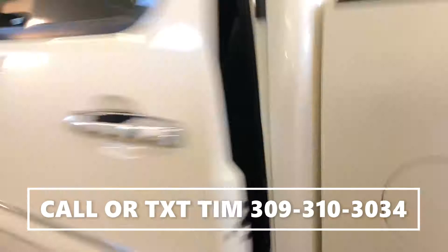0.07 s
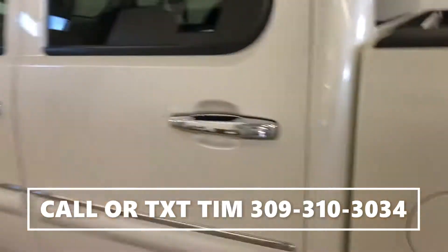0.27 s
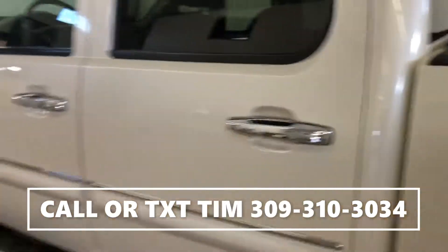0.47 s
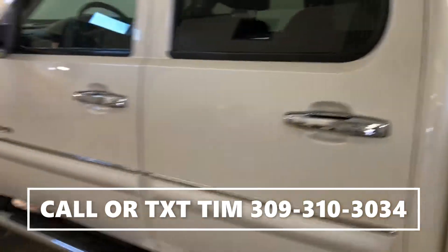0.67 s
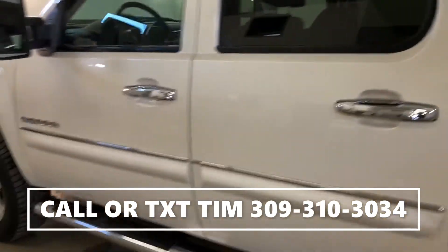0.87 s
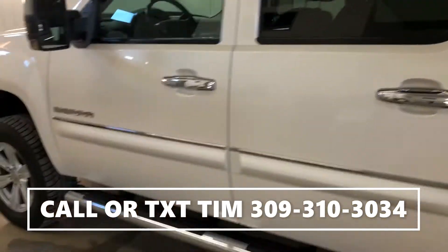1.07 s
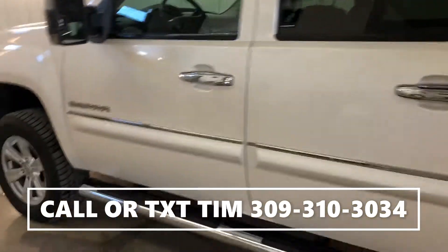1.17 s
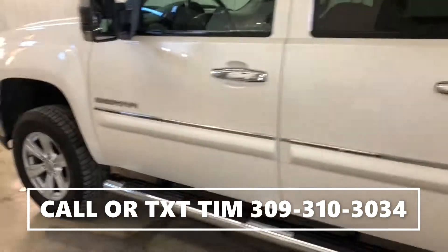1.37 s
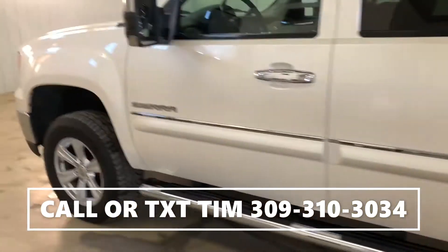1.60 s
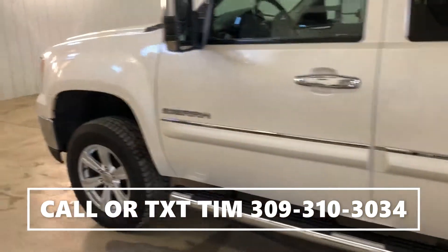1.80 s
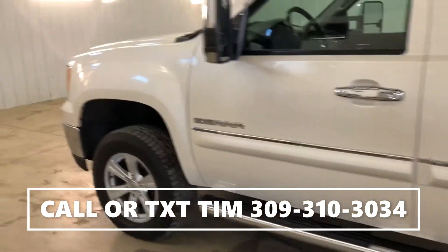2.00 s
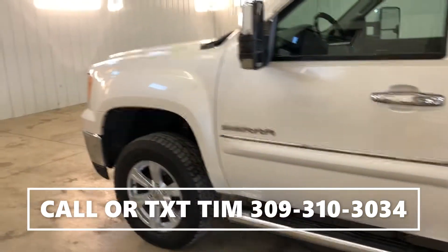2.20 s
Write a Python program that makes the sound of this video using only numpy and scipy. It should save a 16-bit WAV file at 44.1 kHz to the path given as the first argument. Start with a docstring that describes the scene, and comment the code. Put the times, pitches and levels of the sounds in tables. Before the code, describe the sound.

A pickup truck door slams shut once, close by, about a quarter second in, just after faint shoe scuffs. The latch snaps, the steel door booms and a tiny metallic rattle ends by 0.4 seconds. The large garage bay echoes for over a second. Faint scuffs come from around 0.9 seconds and soft steps near 2 seconds, over quiet clothing rustle and a low rush of ventilation.

```python
"""A large hard-walled garage bay, the microphone close to a pickup door. Shoes scuff over the ventilation.
A quarter second in, the door pushes air ahead of it and slams: the latch snaps over the striker,
the steel shell booms twice and the loose pawl rattles. The floor and the truck's side answer at once,
the far wall a little later. The bay rings on for over a second while someone softly steps back."""
import sys
import numpy as np
from scipy import signal
from scipy.fft import rfft, irfft, next_fast_len
from scipy.io import wavfile

SR = 44100
rng = np.random.default_rng(int(sys.argv[2]) if len(sys.argv) > 2 else 0)


def to_wav(s):
    """Save 16-bit WAV."""
    ch = np.atleast_2d(s).T  # columns
    pcm = np.round(np.clip(ch, -1, 1) * 32767)  # PCM
    wavfile.write(sys.argv[1], SR, pcm.astype(np.int16))


N = 99225

# Blows on the door shell. Each row: start in seconds, level in dB, hardness as a corner in Hz.
DOOR_BLOWS = [(.2357, -15, 1800), (0.2436, 0, 1030), (0.2698, -11.5, 680), (0.2778, -2, 210)]
# Modes of the shell and the cab behind it. Each row: pitch in Hz, level in dB, t60 in seconds.
SHELL_MODES = [(52.5, -13.5, 0.33), (92.7, -7, 0.16), (128, -5.5, 0.13), (155, -9, .08), (190.5, -1.5, .12),
               (222.2, -4.5, 0.074), (257, -10.5, 0.058), (304, -12, 0.11), (402, -7.5, 0.053),
               (473, -8, 0.1), (770, -8.5, 0.065), (890, -16.5, 0.033)]
# Crunch of countless short-lived modes in panels and trim. Each row: frequency in Hz, gain in dB.
CRUNCH_SPECTRUM = [(40, 6), (130, -2), (220, 1), (400, 1), (530, -1), (670, -27), (800, -5.5), (1050, -7.5),
                   (1300, -17), (3000, -27), (9000, -39)]
# Metal contacts of latch and door edge.
# Each row: start in seconds, level in dB, t60 in seconds, tilt in dB per octave.
LATCH_CLACKS = [(.2355, -15, .05, -2.5), (0.2416, -10, 0.045, 0.5), (0.2446, -10, 0.028, 1),
                (0.2469, -15, 0.041, .5), (0.267, -24.5, 0.077, 2), (.277, -25.5, 0.052, 1.5)]
# The pawl knocking in its play. Each row: start in seconds, level in dB.
PAWL_KNOCKS = [(0.2921, -14), (0.3155, -18.5), (0.346, -31), (0.371, -34)]
# Ringing latch parts and pawl. Each row: pitch in Hz, level in dB.
LATCH_MODES = [(1502, -37), (2347, -22), (2510, -29), (3677, -28)]
PAWL_MODES = [(1470, -2.5), (1810, -4.5)]
# Noise of a clack, a pawl knock and the air in the door gap. Each row: frequency in Hz, gain in dB.
CLACK_SPECTRUM = [(100, -27), (400, 10), (1000, 5.5), (1600, -1.5), (3500, -5.5), (6000, -11), (10000, -19),
                  (15500, -19)]
KNOCK_SPECTRUM = [(300, -6), (1100, 3.5), (1600, 8.5), (2400, 7.5), (3500, -4), (7000, -9.5),
                  (15500, -26.5)]
GAP_SPECTRUM = [(25, -30), (80, -9.5), (300, 2), (450, 0.5), (700, -3), (2000, -22.5), (8000, -45)]
# Echoes off floor and truck, off the far wall, and all round the bay as it starts to ring.
# Each row: frequency in Hz, gain in dB.
NEAR_SPECTRUM = [(50, -10.5), (200, -22.5), (600, -14), (2000, -10), (6000, -12.5), (15000, -8)]
WALL_SPECTRUM = [(40, -28), (120, -16.5), (300, -16.5), (600, -15.5), (1500, -37), (5000, -22),
                 (15000, -26)]
BAY_SPECTRUM = [(25, -13), (50, -2.5), (110, 2), (220, -1), (320, -2), (500, -8), (900, -14), (1700, -22),
                (2700, -25), (4000, -31), (6000, -37.5), (9000, -38), (15000, -35)]
# How long the bay rings. Each row: frequency in Hz, t60 in seconds.
BAY_DECAY = [(50, 1.3), (110, 0.61), (220, 1.4956), (500, 2.4249), (1400, 3), (3000, 2.66), (6000, 1.47),
             (10000, 0.53), (15000, 0.36)]
# Shoes and clothes scuffing. Each row: start in seconds, level in dB, rise and t60 in seconds.
SHOE_SCUFFS = [(.06, -55.5, 0.036, 1), (0.129, -50.5, 0.011, 0.44), (0.161, -50, 0.008, 0.063),
               (.915, -46.5, 0.0096, 1), (1.29, -58.5, 0.1, 0.36), (1.6, -55.5, 0.055, 1.0)]
# Small taps of moving about. Each row: start in seconds, level in dB, tilt in dB per octave.
SMALL_TAPS = [(0.071, -58, 5), (0.137, -54, 8), (2.003, -60, 9), (2.1, -55, 6), (2.127, -49, -3)]
# Soft footfalls. Each row: start in seconds, level in dB.
SOFT_FOOTFALLS = [(1.863, -53), (2.096, -46), (2.214, -48)]
# Noise of scuffs and taps, of cloth and of the ventilation. Each row: frequency in Hz, gain in dB.
SCUFF_SPECTRUM = [(150, -1), (600, 2), (1500, 0.5), (4000, -0.5), (6000, -15), (9000, -21), (15000, -27)]
CLOTH_SPECTRUM = [(500, -20), (3000, 0.5), (7000, -1), (10000, -4), (15000, -9)]
VENT_SPECTRUM = [(20, -6), (45, -1.5), (110, 0), (220, -2), (320, -6), (550, -6.5), (1200, -12.5),
                 (3000, -18.5), (6000, -30.5), (10000, -43), (15500, -37.5)]
# Loudness of the cloth and of the ventilation. Each row: time in seconds, level in dB.
CLOTH_LEVELS = [(0, -63.5), (.19, -65.5), (.3, -65), (.95, -73), (1.2, -73.5), (1.7, -79), (1.9, -85),
                (2.1, -73), (2.25, -75.5)]
VENT_LEVELS = [(0, -49.5), (.22, -55.5), (.6, -57.5), (1.4, -54), (2.25, -55.5)]

CRUNCH_DB, KNOCK_NOISE_DB = -4.5, -6.5  # relative to each blow or knock
GAP_PEAK_DB, GAP_RISE_DB_PER_S, GAP_SHUT_S = -25, 514, 0.249
BAY_START_S, BAY_BUILD_S, BAY_DB = 0.22, 0.059, -19
RIPPLE_DB, RIPPLE_STEP_HZ = 2.5, 21.93  # uneven ringing across the bay's echo
WALL_DELAY_S = 0.1083
CLOTH_TICKS_PER_S = 220
LOW_CUT_HZ, TOP_HZ, CEILING = 60, 15900, 0.97


def door_shell():
    """Close up, each blow rings the shell and crunches its trim; soft blows reach only the low modes."""
    out = np.zeros(N)
    for start, db, corner in DOOR_BLOWS:
        rolloff_db = lambda hz: -10 * np.log10(1 + (hz / corner) ** 4)
        modes = sum(amp(level + rolloff_db(hz)) * ring(start, hz, t60, swell_cycles=0.46)
                    for hz, level, t60 in SHELL_MODES)
        crunch = noise([(hz, level + rolloff_db(hz)) for hz, level in CRUNCH_SPECTRUM])
        crunch *= amp(CRUNCH_DB) * burst(start, rise=0.0021, t60=0.09)
        out += amp(db) * (modes + crunch)
    return out


def latch_snap():
    """The latch snaps over the striker: each metal contact clacks and rings the steel parts."""
    out = np.zeros(N)
    for start, db, t60, tilt in LATCH_CLACKS:
        steel = sum(amp(level + rng.normal(0, 1.6)) * ring(start, hz, t60=0.09, swell_cycles=0.79)
                    for hz, level in LATCH_MODES)
        clack = burst(start, rise=0.00058, t60=t60) * noise(CLACK_SPECTRUM, tilt)
        out += amp(db) * (clack + steel)
    return out


def pawl_rattle():
    """The loose pawl knocks in its play and rings briefly, weaker each time."""
    out = np.zeros(N)
    for start, db in PAWL_KNOCKS:
        pawl = sum(amp(level) * ring(start, hz, t60=0.04, swell_cycles=0.71) for hz, level in PAWL_MODES)
        knock = amp(KNOCK_NOISE_DB) * burst(start, rise=0.00092, t60=0.025) * noise(KNOCK_SPECTRUM)
        out += amp(db) * (pawl + knock)
    return out


def gap_air():
    """Air squeezed out of the closing gap swells until the door lands."""
    seconds_left = np.maximum(GAP_SHUT_S - since(0), 0)
    swell = amp(GAP_PEAK_DB - GAP_RISE_DB_PER_S * seconds_left)
    return swell * fade(since(GAP_SHUT_S), t60=0.05) * noise(GAP_SPECTRUM)


def reflections(door):
    """Floor and truck throw the slam straight back to the microphone; the far wall adds a dull slap."""
    near = rng.standard_normal(N) * burst(0.001, rise=0.017, t60=0.15)
    slap = rng.standard_normal(N) * burst(WALL_DELAY_S, rise=0.0046, t60=0.15)
    near = coloured(near / np.linalg.norm(near), NEAR_SPECTRUM)
    slap = coloured(slap / np.linalg.norm(slap), WALL_SPECTRUM)
    return signal.fftconvolve(door, near + slap)[:N]


def bay_echo():
    """The hard walls return a faintly ringing wash of noise; bass and treble die first."""
    hz, times, spectra = signal.stft(noise(BAY_SPECTRUM), SR, nperseg=2048)
    age = np.maximum(times - BAY_START_S, 0)
    decay = fade(age, along(BAY_DECAY, hz)[:, None])
    uneven = np.interp(hz / RIPPLE_STEP_HZ, np.arange(len(hz)), rng.standard_normal(len(hz)))
    ripple = unit(amp(RIPPLE_DB * uneven))[:, None]
    wash = signal.istft(spectra * ripple * decay, SR, nperseg=2048)[1][:N]
    build = 1 - np.exp(-(since(BAY_START_S) / BAY_BUILD_S) ** 2)
    return amp(BAY_DB) * wash * build


def footwork():
    """Shoes scuff and tap beside the truck, and soft footfalls ring low."""
    scuffs = sum(amp(db) * burst(start, rise, t60) * noise(SCUFF_SPECTRUM)
                 for start, db, rise, t60 in SHOE_SCUFFS)
    taps = sum(amp(db) * burst(start, rise=0.00043, t60=0.035) * noise(SCUFF_SPECTRUM, tilt)
               for start, db, tilt in SMALL_TAPS)
    falls = sum(amp(db) * ring(start, hz=200, t60=0.32, swell_cycles=0.7) for start, db in SOFT_FOOTFALLS)
    return scuffs + taps + falls


def cloth_rustle():
    """Moving clothes give off tiny ticks of random size."""
    ticks = (rng.random(N) < CLOTH_TICKS_PER_S / SR) * rng.random(N)
    grains = signal.fftconvolve(ticks, fade(since(0), t60=0.043))[:N]
    return level_curve(CLOTH_LEVELS) * unit(grains * noise(CLOTH_SPECTRUM))


def ventilation():
    """Room tone behind it all: a low rush of air whose level drifts a little."""
    return level_curve(VENT_LEVELS) * noise(VENT_SPECTRUM)


def amp(db):
    """Decibels as an amplitude ratio."""
    return 10 ** (np.asarray(db) / 20)


def unit(x):
    """x scaled to rms 1."""
    return x / np.sqrt(np.mean(x ** 2) + 1e-20)


def along(points, hz):
    """(Hz, value) points read off on a log frequency axis."""
    point_hz, values = np.transpose(points)
    return np.interp(np.log(hz + 1), np.log(point_hz + 1), values)


def since(start):
    """Seconds since start, zero before."""
    return np.maximum(np.arange(N) / SR - start, 0)


def level_curve(points):
    """Amplitude that follows (seconds, dB) points."""
    return amp(np.interp(since(0), *np.transpose(points)))


def fade(t, t60):
    """Exponential decay, 60 dB down after t60 seconds."""
    return np.exp(-np.log(1000) * t / t60)


def burst(start, rise, t60):
    """A straight rise, then an exponential decay; times in seconds."""
    return np.minimum(since(start) / rise, 1) * fade(since(start + rise), t60)


def ring(start, hz, t60, swell_cycles):
    """One struck mode that swells over a part of its cycle."""
    t = since(start)
    return np.sin(2 * np.pi * hz * t) * fade(t, t60) * (1 - np.exp(-t * hz / swell_cycles))


def noise(spectrum, tilt_db=0):
    """Noise of rms 1 with a (Hz, dB) spectrum, tilted by tilt_db per octave above 200 Hz."""
    hz = np.fft.rfftfreq(N, 1 / SR)
    octaves = np.log2(np.maximum(hz, 200))
    gain = amp(along(spectrum, hz) + tilt_db * octaves)
    return unit(irfft(rfft(rng.standard_normal(N)) * gain, N))


def coloured(x, spectrum):
    """x through a causal filter with the given (Hz, dB) gains."""
    size = 2 * next_fast_len(N)
    gain = amp(along(spectrum, np.fft.rfftfreq(size, 1 / SR)))
    cepstrum = irfft(np.log(gain), size)
    cepstrum[1:size // 2] *= 2  # folded onto positive time for minimum phase
    cepstrum[size // 2 + 1:] = 0
    return irfft(rfft(x, size) * np.exp(rfft(cepstrum)), size)[:N]


def scene():
    """One spot beside the truck, in mono: the door up front, the bay and its quiet sounds behind."""
    door = door_shell() + latch_snap() + pawl_rattle() + gap_air()
    return (door + reflections(door) + bay_echo() + footwork() + cloth_rustle() + ventilation())[None]


def record(dry):
    """The microphone drops the deepest bass, rounds off the highest peaks and cuts the top treble."""
    low_cut = signal.butter(2, LOW_CUT_HZ, 'highpass', fs=SR, output='sos')
    lean = signal.sosfilt(low_cut, dry)
    rounded = lean / (1 + np.abs(lean / CEILING) ** 6) ** (1 / 6)
    size = next_fast_len(N + SR // 2)
    in_band = np.fft.rfftfreq(size, 1 / SR) < TOP_HZ
    return irfft(rfft(rounded, size) * in_band, size)[..., :N]


dry = scene()
out = record(dry)
to_wav(out)
```